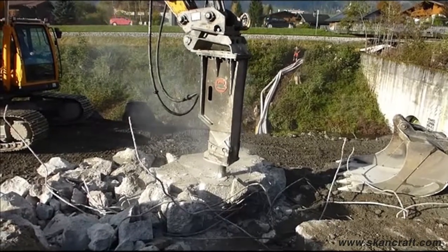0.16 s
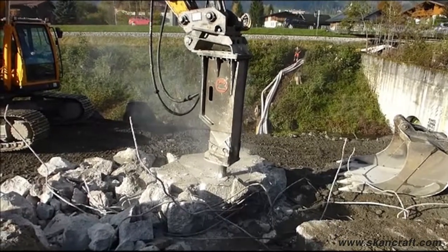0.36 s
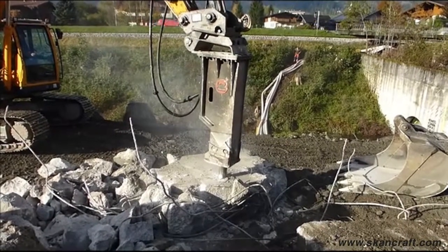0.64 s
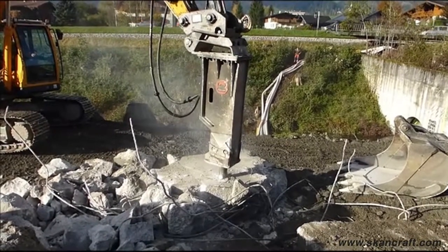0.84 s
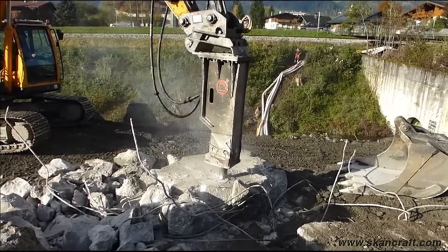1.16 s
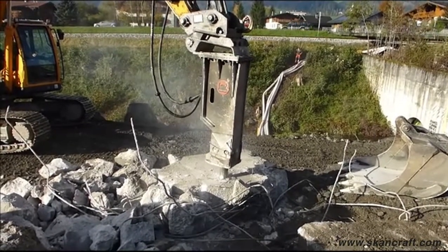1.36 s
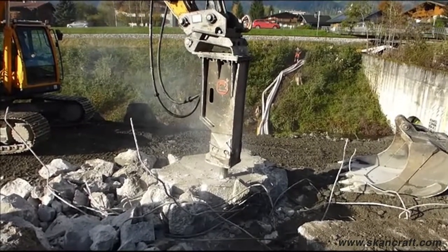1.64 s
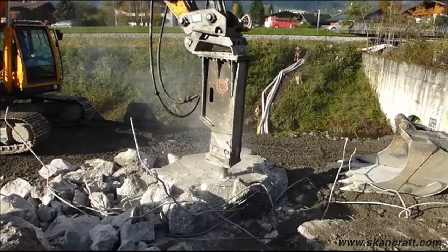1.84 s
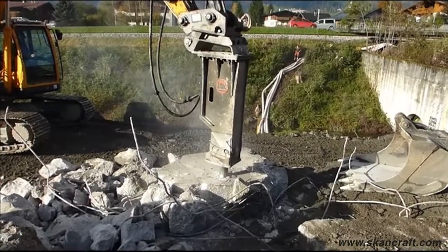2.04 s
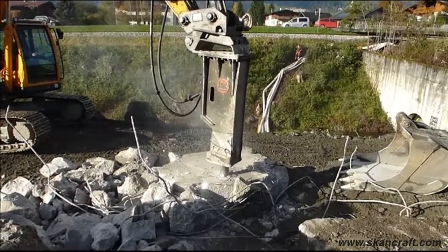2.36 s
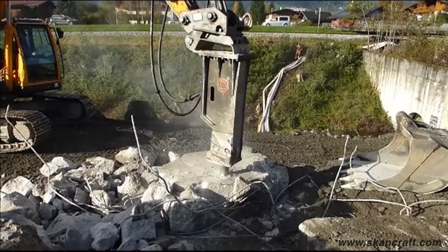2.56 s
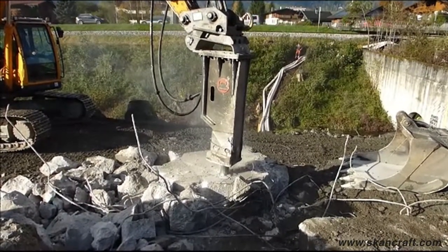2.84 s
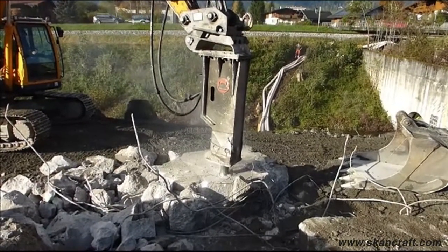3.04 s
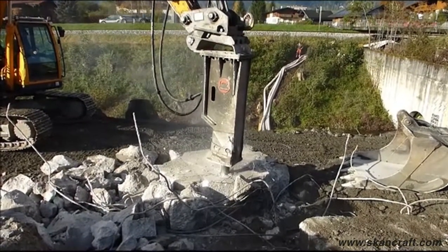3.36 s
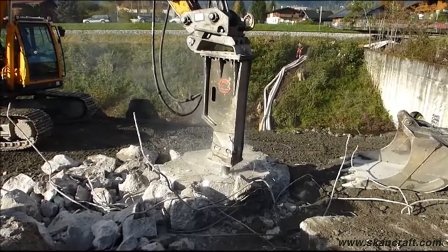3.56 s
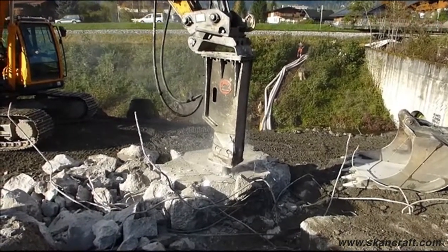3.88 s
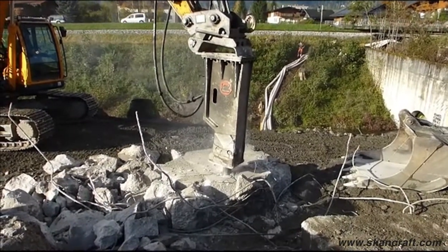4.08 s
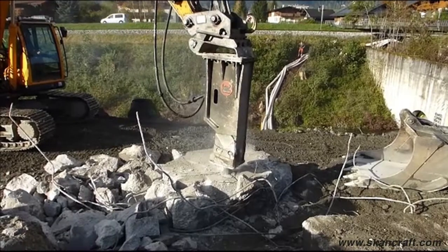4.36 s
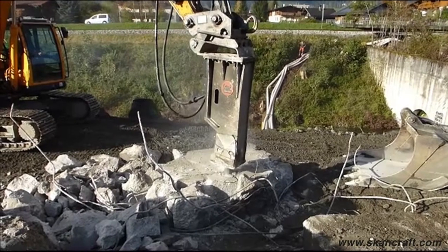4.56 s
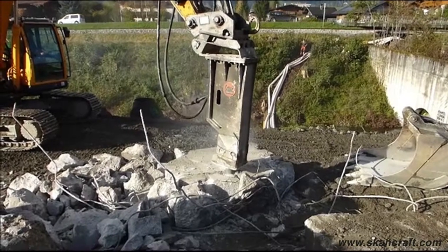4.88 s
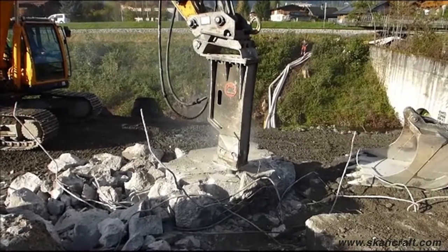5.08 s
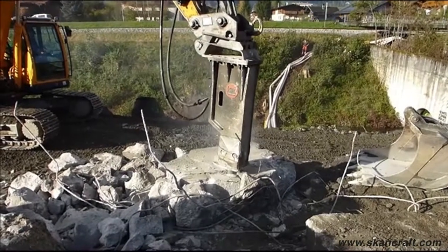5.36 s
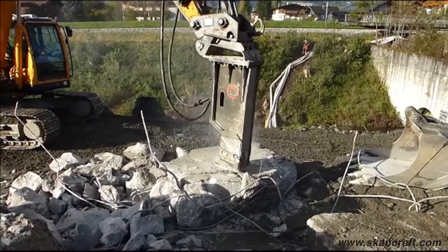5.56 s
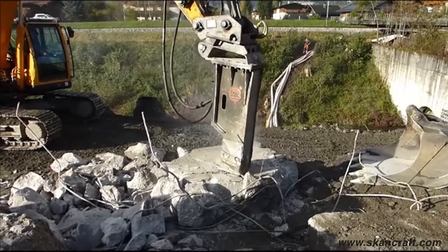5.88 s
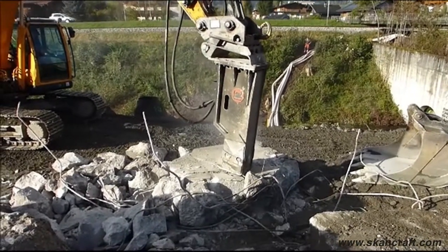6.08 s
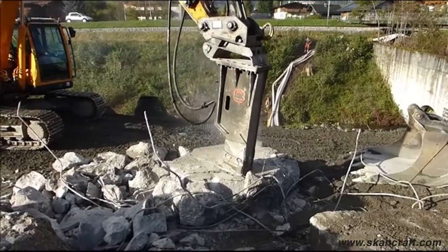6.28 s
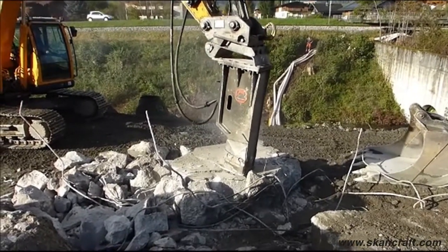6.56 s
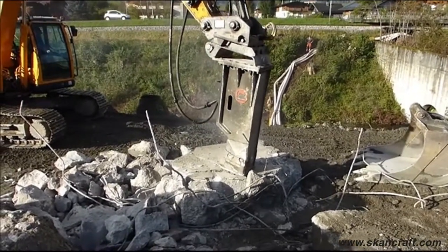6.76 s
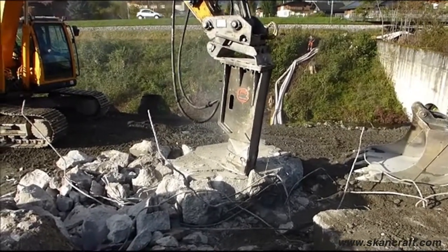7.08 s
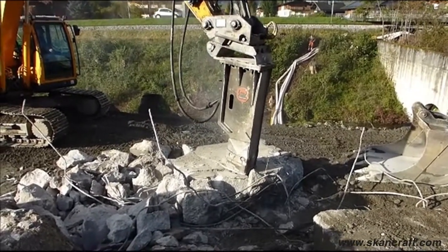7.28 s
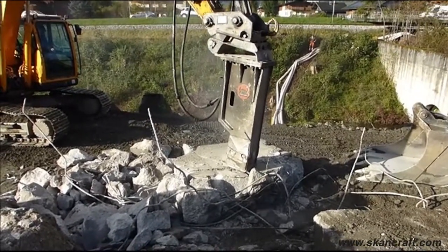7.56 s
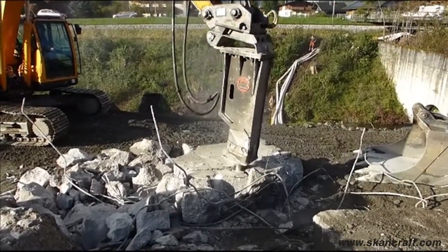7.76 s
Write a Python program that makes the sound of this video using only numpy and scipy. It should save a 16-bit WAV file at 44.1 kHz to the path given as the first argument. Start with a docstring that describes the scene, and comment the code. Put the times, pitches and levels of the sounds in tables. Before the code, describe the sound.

Hard steel pounding on a concrete block, about eight cracks a second, booming and ringing before slowing and giving way to machine idle.

```python
"""A hydraulic breaker on an excavator pounds a concrete block in an open pit beside a wall.
Each cycle is a spit of oil (coloured noise), then the piston's blow, a noise crack that rings the steel.
As the chisel bites in, it clanks in its crater and the block booms; the blows slow as the block gives way.
A last stroke ends in a soft clunk; then the engine hums on with a thin oil whistle and a few falling chips.
Until the clunk, splinters patter around the blows; engine and pump tones run throughout over rushing noise."""
import sys
import numpy as np
from scipy import signal
from scipy.fft import rfft, irfft, next_fast_len
from scipy.io import wavfile

SR = 44100
rng = np.random.default_rng(int(sys.argv[2]) if len(sys.argv) > 2 else 0)


def transcribe(signal):
    """Save signal, clipped to [-1, 1], as a 16-bit WAV file at the path in sys.argv[1]."""
    frames = np.atleast_2d(signal).T
    limited = np.clip(frames, -1, 1)
    pcm = np.round(limited * 32767).astype(np.int16)
    wavfile.write(sys.argv[1], SR, pcm)


N = 349713

TIME = np.arange(N) / SR
# samples that one stroke lasts, with its clock (s) and the frequencies (Hz) of its spectrum
SIZE = 2 ** 14
AGE = np.arange(SIZE) / SR
HZ = np.fft.rfftfreq(SIZE, 1 / SR)
# start of the last, cushioned stroke
CLUNK_S = 6.925


def amp(db):
    """Turn decibels into a plain multiplier."""
    return 10 ** (np.asarray(db) / 20)


def rms_one(x):
    """Scale a sound to an average (rms) strength of 1."""
    return x / np.sqrt(np.mean(x ** 2) + 1e-20)


def at_hz(table, hz, axis=1):
    """Read one column of a table, with frequency on a logarithmic scale."""
    table = np.array(table, float)
    return np.interp(np.log(np.maximum(hz, 1)), np.log(table[:, 0]), table[:, axis])


def in_time(rows, at=TIME):
    """Read every column of a time curve at the given moments."""
    s, *columns = np.transpose(rows)
    return [np.interp(at, s, column) for column in columns]


def noise(gain_of_hz):
    """Make steady noise, shaped over frequency, with rms 1."""
    size = next_fast_len(N)
    spectrum = rfft(rng.standard_normal(size))
    shaped = irfft(spectrum * gain_of_hz(np.fft.rfftfreq(size, 1 / SR)), size)
    return rms_one(shaped[:N])


def drift(rate_hz):
    """Wander slowly and randomly, with rms 1."""
    return noise(lambda hz: 1 / (1 + (hz / rate_hz) ** 2))


def fade(t60):
    """Die away by 60 dB in t60 seconds."""
    return np.exp(-np.log(1000) * AGE / t60)


def swell(rise_s):
    """Rise smoothly from silence at the start of a stroke."""
    return 1 - np.exp(-AGE / rise_s)


def alike_noise(likeness):
    """Give each stroke a row of noise that keeps a share of the last, as the same parts shake the same way."""
    rows = rng.standard_normal((len(likeness), SIZE))
    for k, keep in enumerate(np.clip(likeness, 0, 1)):
        if k:
            rows[k] = keep * rows[k - 1] + np.sqrt(1 - keep ** 2) * rows[k]
    return rows


def coloured(bursts, colour_db, even_hz=25, even_share=0.059):
    """Even out each burst's spectrum, then colour it, with a filter that never sounds ahead of its input."""
    spectra = rfft(bursts)
    bins = np.arange(len(HZ))
    # the averaging window widens with frequency
    reach = np.maximum((even_hz + even_share * HZ) / 2 / HZ[1], 1).astype(int)
    low, high = np.maximum(bins - reach, 0), np.minimum(bins + reach, bins[-1])
    power = np.abs(spectra) ** 2
    for _ in range(2):
        summed = np.cumsum(power, axis=-1)
        power = (summed[..., high] - summed[..., low]) / (high - low)
    # folding the cepstrum gives the filter minimum phase
    cepstrum = irfft(np.log(amp(colour_db) / np.sqrt(power + 1e-12)))
    cepstrum[..., 1:SIZE // 2] *= 2
    cepstrum[..., SIZE // 2 + 1:] = 0
    return irfft(spectra * np.exp(rfft(cepstrum)))


def placed(times, sounds):
    """Lay each sound down at its time."""
    out = np.zeros(N + 2 * SIZE)
    for s, sound in zip(times, sounds):
        start = SIZE + int(round(s * SR))
        out[start:start + SIZE] += sound
    return out[SIZE:SIZE + N]


# how the chisel sits: time_s, seat [0 on the hard face, 1 wedged in its crater, 2 broken through]
SEAT = [(0, 0.37), (1.9, 0.36), (2.3, 0.49), (3.0, 0.95), (5.0, 1.25), (5.65, 1.74), (6.8, 1.85)]
# pace of the piston in the steady run: time_s, blows_per_s
PACE = [(0, 8.179), (.76, 8.25), (1.21, 8.153), (1.76, 8.168), (2.27, 8.319), (3.57, 8.26), (4.58, 8.082),
        (4.9, 7.512)]
# the block takes up more of each blow as the chisel bites in: time_s, weight_db
BITE = [(1.1, -3.5), (2.5, -.8), (4.9, 0.5)]
# single, laboured blows as the block gives way: start_s, weight_db, extra_thud_db
SLOW_BLOWS = [(5.0288, 1.5, -3), (5.1777, 0.5, -1), (5.3371, 0.5, -0.5), (5.499, -1.5, 1.3),
              (5.678, -1.5, 1), (5.862, -0.5, -5), (6.0411, .5, -8), (6.2309, -1.5, 1), (6.4227, -2, 3),
              (6.5902, -0.1, 1), (6.7366, -2.5, 1.5)]


def blows(first_s=.0092, steady_until_s=4.95, face_thud_db=2, thud_loss_db=3.5):
    """Time the steady piston cycles, then the slow blows; a firmer thud comes from the hard face."""
    clock = np.linspace(first_s, steady_until_s, SIZE)
    pace, = in_time(PACE, clock)
    cycles = np.cumsum(pace) * (clock[1] - clock[0])
    # one blow at each whole cycle
    steady = np.interp(np.arange(cycles[-1]), cycles - cycles[0], clock)
    weight_db, = in_time(BITE, steady)
    seat, = in_time(SEAT, steady)
    run = np.column_stack([steady, weight_db, face_thud_db - thud_loss_db * seat])
    times, weight_db, thud_db = np.vstack([run, SLOW_BLOWS]).T
    return times, in_time(SEAT, times)[0], weight_db, thud_db


# engine and pump: time_s, firing_hz [middle of its wobble], gain_db
ENGINE = [(0, 84.7, -41.5), (5.5, 84.73, -41), (6.9, 85.4, -44.5), (7.15, 86.5, -47.5), (7.4, 86.1, -47),
          (7.7, 86.7, -46.5), (7.93, 87.9, -45.5)]
# engine and pump tones: multiple_of_firing_hz, relative_level_db [middle of its waver]
ENGINE_ORDERS = [(1, -12), (5 / 3, -11), (2, -8.5), (3, -11), (6, -9), (32 / 3, -22), (10, -34)]
# colour of fan, engine block and oil flow: pitch_hz, relative_level_db
ENGINE_NOISE = [(25, -22), (53, -14), (80, -6.5), (150, -7), (240, -5), (340, -14.5), (520, -5), (700, -13),
                (1500, -20), (2200, -22.5), (5000, -30.5), (9200, -40.5), (11100, -38.5), (16000, -50)]


def engine(noise_db=-1, wobble=0.00492, waver_db=3.0, throb=0.17):
    """Sum firing and pump tones over fan and flow noise that throbs with the firings."""
    firing_hz, gain_db = in_time(ENGINE)
    phase = 2 * np.pi * np.cumsum(firing_hz * (1 + wobble * drift(9.0))) / SR
    tones = 0
    for multiple, level_db in ENGINE_ORDERS:
        strength = amp(level_db + waver_db * drift(6.5)) * np.sqrt(2)
        tones = tones + strength * np.sin(multiple * phase + rng.uniform(0, 2 * np.pi))
    rush = noise(lambda hz: amp(at_hz(ENGINE_NOISE, hz)) * hz / (hz + 10))
    rush = rush * (1 + throb * np.sin(phase))
    return amp(gain_db) * (tones + amp(noise_db) * rush)


# thin whistle of oil in the idle circuit: time_s, level_db
WHISTLE = [(7.05, -110), (7.2, -81), (7.5, -79), (7.93, -83)]


def whistle(centre_hz=10650, width_hz=130):
    """Oil sings in a narrow passage once the breaker rests: noise in a very narrow band."""
    level_db, = in_time(WHISTLE)
    return amp(level_db) * noise(lambda hz: 1 / (1 + ((hz - centre_hz) / width_hz) ** 2))


# falling chips: start_s, relative_level_db
CHIPS = [(7.609, -23), (7.757, -21), (7.769, -23), (7.822, -22)]
# colour of a chip's tick: pitch_hz, relative_level_db
CHIP_COLOUR = [(500, -25), (4500, -5), (8000, -13), (13000, -11), (16000, -10)]


def chips(t60=.012):
    """Small pieces of concrete tick on the rubble: very short noise bursts."""
    times, level_db = np.transpose(CHIPS)
    ticks = rng.standard_normal((len(times), SIZE)) * fade(t60)
    return placed(times, coloured(ticks, level_db[:, None] + at_hz(CHIP_COLOUR, HZ), even_hz=1000))


def grit(per_s=160, level_db=-63, spread_db=4, cycles=22, count=12):
    """Until the clunk, splinters patter on the rubble, each hit ringing one of several high resonators."""
    flying = rng.random(N) < per_s * (TIME < CLUNK_S) / SR
    hits = flying * amp(level_db + spread_db * np.minimum(rng.exponential(1, N), 4))
    dealt = rng.integers(0, count, N)
    out = 0
    for k, hz in enumerate(np.geomspace(3500, 13000, count)):
        # each ring dies by 60 dB over the same number of cycles
        r = np.exp(-np.log(1000) * hz / cycles / SR)
        w = 2 * np.pi * hz / SR
        struck = hits * (dealt == k) + 1e-18
        out = out + signal.lfilter([0, np.sin(w)], [1, -2 * r * np.cos(w), r * r], struck)
    return out


# colour of the ground's rumble: pitch_hz, relative_level_db
GROUND_COLOUR = [(15, -12), (30, -6), (60, 11), (90, 8), (200, -25), (1000, -70)]


def ground(level_db=9, loss_per_seat_db=7, rise_s=.008, t60=0.79, likeness=0.76):
    """Each blow sends a low rumble through the ground, strongest while the block is whole."""
    times, seat, *_ = blows()
    shakes = alike_noise(np.full(len(times), likeness)) * swell(rise_s) * fade(t60)
    colour_db = level_db - loss_per_seat_db * seat[:, None] + at_hz(GROUND_COLOUR, HZ)
    return placed(times, coloured(shakes, colour_db))


# boom of the block: pitch_hz [middle of its shifts], relative_level_db, t60_s
BLOCK_MODES = [(205.3, -29, 0.38), (256.3, -33, 0.4), (296, -33, .35), (332.5, -27.5, 0.37),
               (406.4, -31, 0.27), (668, -26, 0.29), (862, -34.5, 0.51)]
# the block comes loose, and later splits and booms less: time_s, gain_db
LOOSENESS = [(0, -13), (2.1, -19), (2.9, -0.5), (5.2, 0.5), (5.7, -15)]


def block(rise_s=0.016, spread_db=1.0, phase_spread=0.16, detune=.012):
    """The loosened block booms on between blows, its pitch shifting a little as it rocks."""
    times, *_ = blows()
    loose_db, = in_time(LOOSENESS, times)
    rings = 0
    for hz, level_db, t60 in BLOCK_MODES:
        size, phase, shift = rng.standard_normal((len(times), 3)).T[..., None]
        cycles = hz * (1 + detune * shift) * AGE + phase_spread * phase
        strength = amp(level_db + loose_db[:, None] + spread_db * size)
        rings = rings + strength * np.sin(2 * np.pi * cycles) * fade(t60)
    return placed(times, rings * swell(rise_s))


# colour of oil spitting through the valve: pitch_hz, relative_level_db
VALVE_COLOUR = [(100, -32), (400, -15), (900, -1.5), (2300, -20), (3050, -7), (4300, -19.5), (5900, -17.5),
                (8600, -23.5), (9600, -13.5), (11300, -17), (13000, -25), (16000, -40)]


def valve(level_db=6.0, lead_s=.029, rise_s=0.0048, t60=0.083, likeness=1.0):
    """The valve switches just before each stroke and oil spits through it, the same way each time."""
    times = np.append(blows()[0], CLUNK_S) - lead_s
    spits = alike_noise(np.full(len(times), likeness)) * swell(rise_s) * fade(t60)
    return placed(times, coloured(spits, level_db + at_hz(VALVE_COLOUR, HZ), even_hz=400))


# colour of the last stroke's rattle: pitch_hz, relative_level_db
CLUNK_COLOUR = [(29, -50), (50, -8), (218, -8), (246, -10), (389, -15), (661, -4.5), (905, -22),
                (973, -6.5), (1470, -22), (2750, -19.5), (3180, -25.5), (9640, -37.5), (16000, -50)]


def clunk(level_db=25, rise_s=0.036, t60=0.14, boom_db=25, boom_hz=245, boom_width_hz=55, boom_t60=0.45):
    """The piston sinks into its oil cushion: the housing rattles, then booms on."""
    rattle, boom = rng.standard_normal((2, SIZE)) * swell(rise_s)
    rattle = coloured(rattle * fade(t60), level_db + at_hz(CLUNK_COLOUR, HZ))
    boom_colour_db = boom_db - 10 * np.log10(1 + (2 * (HZ - boom_hz) / boom_width_hz) ** 2)
    boom = coloured(boom * fade(boom_t60), boom_colour_db)
    return placed([CLUNK_S], [rattle + boom])


# ring of the steel between blows:
# pitch_hz [middle], level_when_loose_db [middle], t60_s, loss_per_step_of_firmness_db
FREE_RING = [(1130, -34, .3, 8), (2665, -38, .32, 5.5), (3090, -37, .24, 5), (3850, -43, .2, 6),
             (5080, -42, .2, 3), (6800, -46, .18, 1), (8350, -48, .2, 1), (10050, -48, .16, 0),
             (11950, -47, .16, 2), (14000, -55, .15, 2)]


def free_ring(spread_db=2.5, rise_s=0.0039, clang_db=17, clang_damped_db=15, clang_t60=0.1,
              clang_top_hz=3800, detune=.004):
    """A firm seat damps the chisel; looser, it sings on, and its lower modes start with a growing clang."""
    times, seat, *_ = blows()
    firmness = np.maximum(2 - seat[:, None], 0)
    rings = 0
    for hz, level_db, t60, damped_db in FREE_RING:
        size, phase, shift = rng.standard_normal((len(times), 3)).T[..., None]
        clang = amp(clang_db - clang_damped_db * firmness) / (1 + np.square(hz / clang_top_hz) ** 2)
        strength = amp(level_db - damped_db * firmness + spread_db * size)
        envelope = strength * (fade(t60) + clang * fade(clang_t60))
        rings = rings + envelope * np.sin(2 * np.pi * (hz * (1 + detune * shift) * AGE + phase))
    return placed(times, rings * swell(rise_s))


# clank of the chisel against the sides of its crater: time_s, level_db
CLANK = [(0, -36), (3.0, -31), (3.9, -17), (4.7, -21.5), (5.4, -14.5), (5.7, -36), (6.8, -42)]


def clank(hz=3525, t60=0.049, rise_s=0.001, spread_hz=14):
    """Deep in its crater the chisel clanks near one pitch, which the concrete soon damps."""
    times, *_ = blows()
    level_db, = in_time(CLANK, times)
    pitch_hz = hz + spread_hz * rng.standard_normal((len(times), 1))
    tones = amp(level_db)[:, None] * np.sin(2 * np.pi * pitch_hz * AGE)
    return placed(times, tones * fade(t60) * swell(rise_s))


# resonances of chisel, housing and block, with the lift each gives in three seats:
# pitch_hz, width_hz, lift_on_face_db, lift_wedged_db, lift_broken_through_db
MODES_OF_BREAKER = [(125, 32, 0, 2.5, 0), (217, 68, 11.5, 3.5, 7), (240, 61, 7, 10, -6.5),
                    (290, 19, -1, 0, -10), (330, 14.5, 4.5, 16.5, 0.5), (354.7, 45, 2, -14.5, 10),
                    (416.4, 49, 13, 17.5, 14), (496.5, 37, 8, 11, 3.5), (554, 113, 11, 8.5, 18.5),
                    (607, 85, 17, 5, 3.5), (698.2, 22, 10, 14.5, 13.5), (774, 43, 13.5, 11.5, -6),
                    (854.6, 103, 1, 14.5, 12), (988, 20, 13.5, 15, 9), (1109, 184, 10.5, 4.5, 21),
                    (1287.6, 44, 8, 15.5, 11), (1445, 42, 5, 13.5, 2), (1554, 109, 11.5, 9, 8.5),
                    (1980, 310, -11, 8, 4), (2095, 140, 18.5, -4, 9), (2490, 200, 15.5, -1, 12.5),
                    (2672, 265, 10.5, -0.5, 14), (2965, 263, 19, 0, 8), (3088, 144, -4.5, 10.5, 5.5),
                    (3540, 198, 10.5, 15, 10.5), (3954, 140, 8.5, 3, 7), (4170, 110, 1.5, 4.5, 2),
                    (4750, 102, -5, 12.5, 5.5), (5090, 360, 6.5, 5, 9), (6610, 200, 4.5, 5.5, 5),
                    (10110, 170, 5.5, 6, 5)]
# broad colour of a blow: pitch_hz, relative_level_db
BLOW_COLOUR = [(50, -17), (80, -7), (120, 1.5), (180, 0.6), (400, -13), (700, -12.5), (1700, -16),
               (2400, -15.5), (3500, -12.5), (6000, -22.5), (8500, -27.5), (11000, -30), (15500, -43.5)]


def blow_colour(ring_share, thud_hz=300, crack_hz=2000, crack_db=-0.12):
    """Colour each blow: the seat picks the resonances; weight and thud act mainly on body and lows."""
    _, seat, weight_db, thud_db = blows()
    centre_hz, width_hz, *lifts_db = np.transpose(MODES_OF_BREAKER)
    bells = 1 / (1 + (2 * (HZ - centre_hz[:, None]) / width_hz[:, None]) ** 2)
    # blend the two nearest seats
    distance = np.abs(np.clip(seat, 0, 2)[:, None] - np.arange(len(lifts_db)))
    share = np.clip(1 - distance, 0, 1)
    resonances_db = ring_share * share @ np.array(lifts_db) @ bells
    low = 1 / (1 + np.square(HZ / thud_hz) ** 2)
    body = 1 / (1 + np.square(HZ / crack_hz) ** 2)
    tone_db = np.outer(thud_db, low) + np.outer(weight_db, body) + crack_db * (1 - body)
    return at_hz(BLOW_COLOUR, HZ) + resonances_db + tone_db


# how a blow dies away: pitch_hz, crack_t60_s, tail_relative_level_db, tail_t60_s
DYING = [(149, 0.044, -9, 0.27), (544, 0.043, 5, 0.18), (1470, 0.055, 1, 0.15), (3300, 0.043, -6.5, 0.13),
         (6000, 0.06, -6.5, 0.15), (11000, 0.056, -11, 0.086)]


def dying(rows, t60s):
    """Let each frequency band of the noise fade at its own pace."""
    spectra = rfft(rows)
    centres_hz = np.array(DYING)[:, 0]
    faded = 0
    for own, t60 in zip(np.eye(len(t60s)), t60s):
        # each band overlaps its neighbours in a triangle
        band = irfft(spectra * at_hz(np.column_stack([centres_hz, own]), HZ))
        faded = faded + band * fade(t60)
    return faded


def shaking(seat, firm_share=0.01, share_per_seat=0.076, loose_share=0.1, fresh=0.3):
    """Blows repeat closely on the hard face and differ more as the block loosens."""
    change = firm_share + share_per_seat * seat + loose_share * np.maximum(seat - 1, 0)
    return alike_noise(1 - change) + fresh * rng.standard_normal((len(seat), SIZE))


def pit(level_db=25.0, rise_s=0.013, ring_share=0.34):
    """Each blow scatters off rubble and banks into a grainy tail, longest in the lows."""
    times, seat, *_ = blows()
    hz, _, tail_db, tail_t60 = np.transpose(DYING)
    colour_db = level_db + blow_colour(ring_share) + at_hz(np.column_stack([hz, tail_db]), HZ)
    scatter = shaking(seat, firm_share=0.048, share_per_seat=0.13, loose_share=.15, fresh=0.25)
    return placed(times, coloured(dying(scatter, tail_t60) * swell(rise_s), colour_db))


def wall(direct, delay_s=0.044, level_db=-23, low_hz=500):
    """The wall throws back a faint, thin slap: a late copy with less bass."""
    slap = signal.sosfilt(signal.butter(1, low_hz, "high", fs=SR, output="sos"), direct)
    return amp(level_db) * np.interp(TIME - delay_s, TIME, slap, left=0)


def cracks(level_db=23.0, shove=0.51, shove_s=0.00411, shove_width_s=0.00086):
    """Steel hits concrete: one shove of the whole housing inside a short, dense crack of noise."""
    times, seat, *_ = blows()
    crack_t60 = np.transpose(DYING)[1]
    # a loosely seated chisel cracks more abruptly
    rise_s = np.interp(seat, np.arange(3), [.004, .0018, .0009])
    burst = dying(shaking(seat), crack_t60) * swell(rise_s[:, None])
    thud = shove * np.exp(-((AGE - shove_s) / shove_width_s) ** 2)
    return placed(times, coloured(burst + thud, level_db + blow_colour(ring_share=1)))


def scene():
    """Add up breaker, machine and rubble, heard from one spot."""
    direct = cracks() + clank()
    breaker = direct + wall(direct) + pit() + free_ring() + valve() + clunk()
    surroundings = block() + ground() + engine() + whistle() + grit() + chips()
    return (breaker + surroundings)[None]


def record(dry, bass_hz=30, cutoff_hz=15900):
    """The microphone thins the deepest bass, and a steep filter cuts the top."""
    thinned = signal.sosfilt(signal.butter(1, bass_hz, "high", fs=SR, output="sos"), dry)
    return signal.sosfilt(signal.ellip(10, .1, 80, cutoff_hz, fs=SR, output="sos"), thinned)


dry = scene()
out = record(dry)
transcribe(out)
```